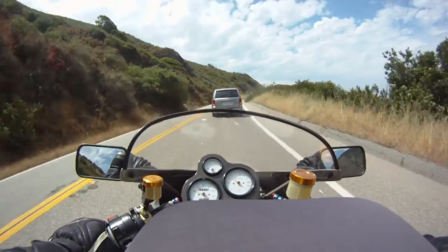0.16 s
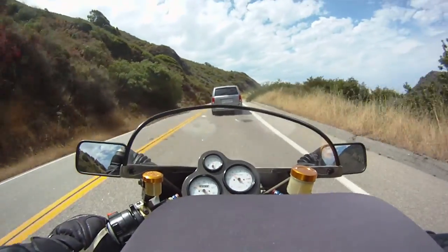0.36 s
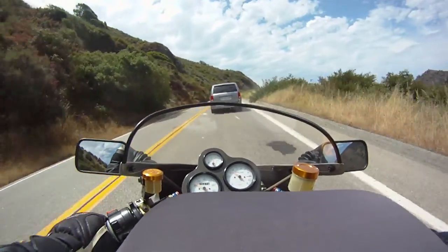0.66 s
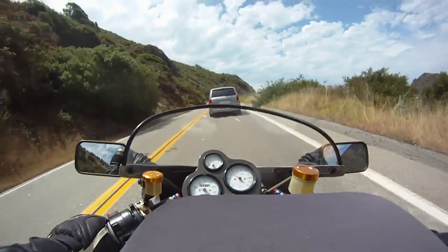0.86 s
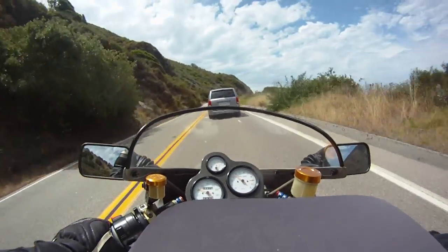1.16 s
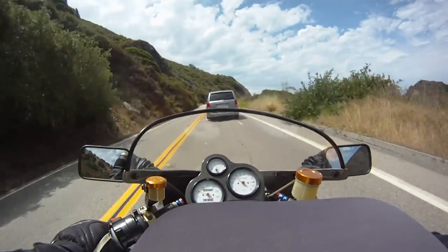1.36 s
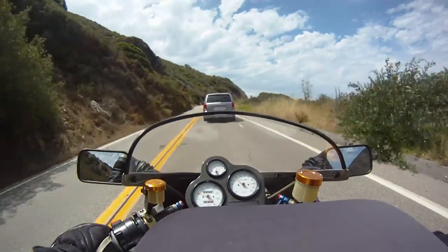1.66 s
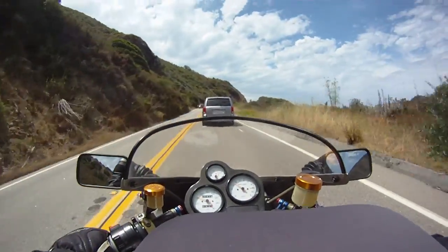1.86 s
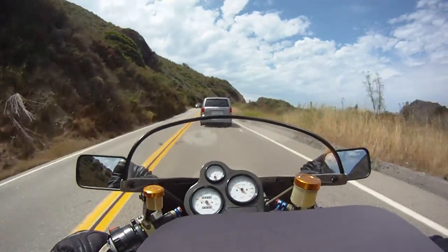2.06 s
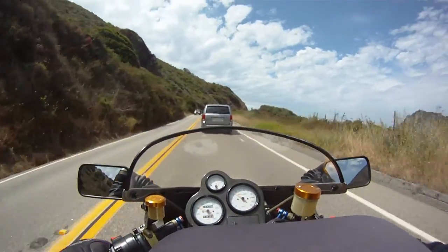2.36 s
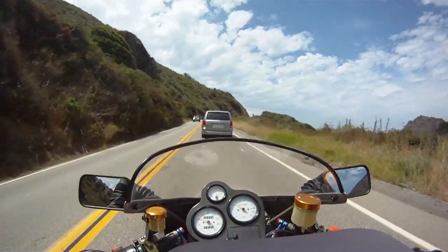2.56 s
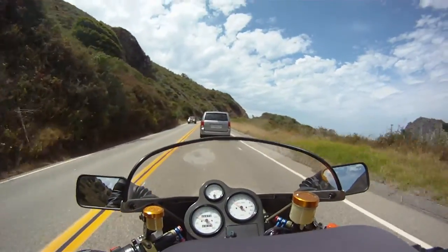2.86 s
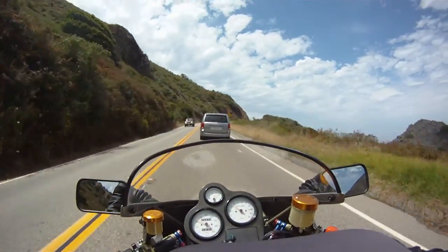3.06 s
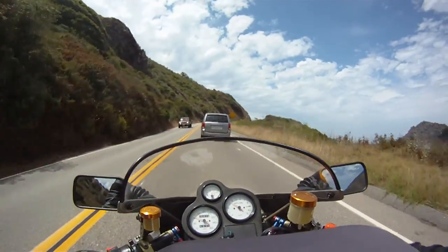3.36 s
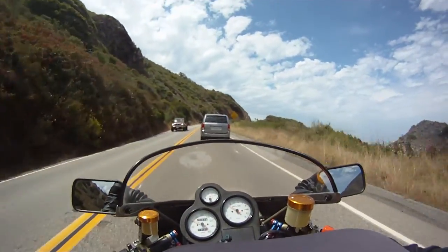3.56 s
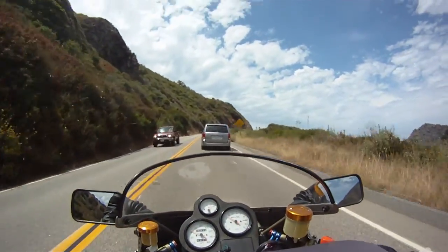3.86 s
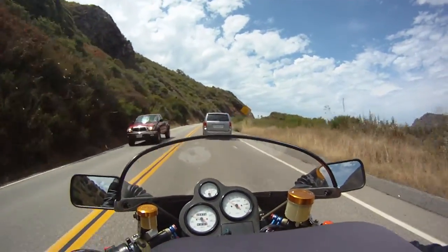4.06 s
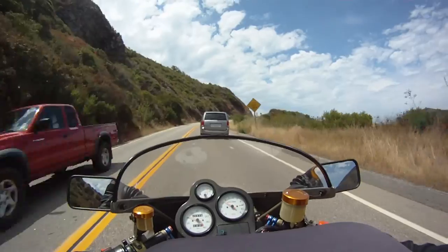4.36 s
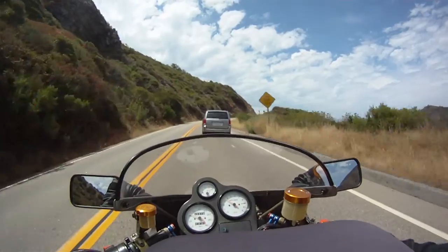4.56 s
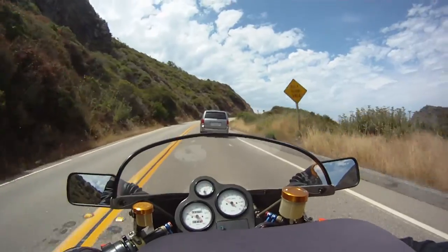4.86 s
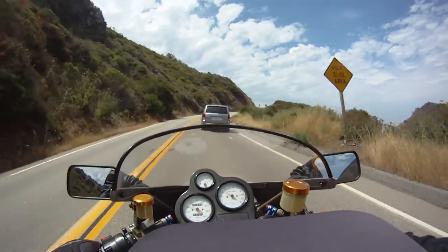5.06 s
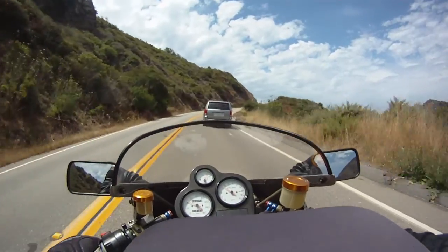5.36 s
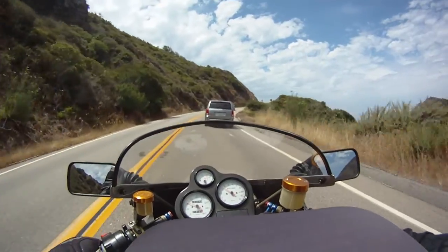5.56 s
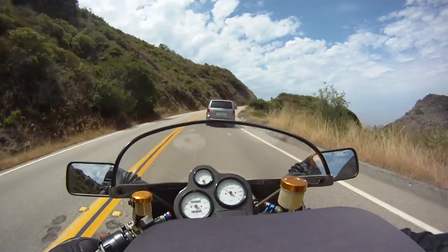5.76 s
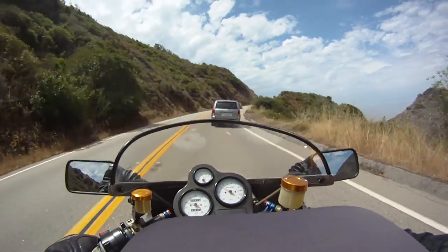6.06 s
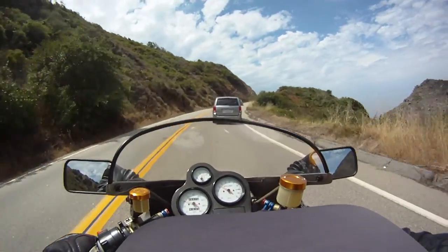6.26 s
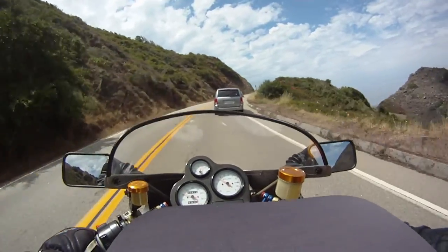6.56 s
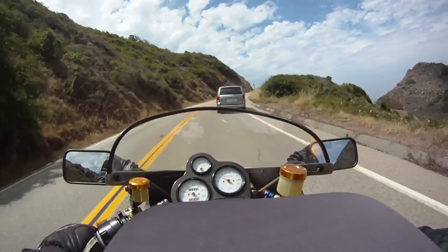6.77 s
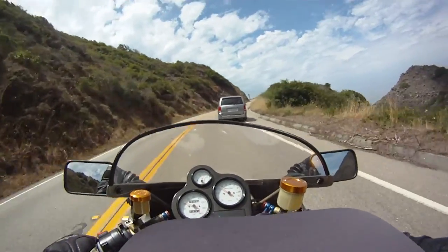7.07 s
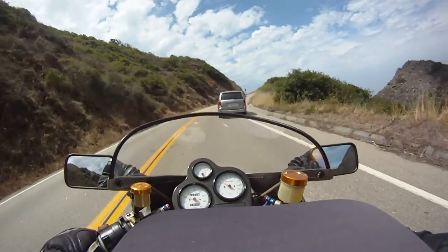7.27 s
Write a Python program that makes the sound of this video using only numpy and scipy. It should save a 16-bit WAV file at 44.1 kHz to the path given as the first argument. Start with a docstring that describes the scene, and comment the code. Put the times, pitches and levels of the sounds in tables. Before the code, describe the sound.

Close onboard microphone behind a motorcycle windscreen on an open coastal road. A twin-cylinder engine drones low and continuous with fine gear whine and valve clatter. Revs edge up in the first second, then slowly sag as the rider eases off. Wind rumbles and flutters throughout, with brief tearing gusts and several hard thumps that momentarily duck everything. Thin, gritty treble sizzle covers it.

```python
"""Coast road: a V-twin motorcycle cruises, revs edging up and then slowly falling, heard behind its windscreen.
The exhaust drones as a sum of cycle orders; valves, gears and engine cases clatter in step with the crank.
Filtered noise makes the wind: it rumbles, tumbles over the screen and tears in gusts.
Heavy buffets are single pressure swings that make the camera's limiter duck.
The camera's coarse sampling mirrors the sound into a thin treble sizzle."""
import sys
import numpy as np
from scipy import signal
from scipy.fft import rfft, irfft, next_fast_len
from scipy.io import wavfile
from scipy.ndimage import minimum_filter1d, map_coordinates

SR = 44100
rng = np.random.default_rng(int(sys.argv[2]) if len(sys.argv) > 2 else 0)


def bounce(signal):
    """Save signal as a 16-bit WAV file at the path given by the first command-line argument."""
    frames = np.transpose(np.atleast_2d(signal))
    limited = np.clip(frames, -1, 1)
    pcm = np.round(limited * 32767).astype(np.int16)
    wavfile.write(sys.argv[1], SR, pcm)


N = 326781
T = np.arange(N) / SR

# spectrum of tearing air: freq_hz, relative_db_per_hz
TEAR_SPECTRUM = [(150, -12), (450, 0), (800, -2), (1500, -9), (2500, -22), (5000, -37)]


def amp(db):
    """Decibels to amplitude ratio."""
    return 10 ** (np.asarray(db) / 20)


def unit(x):
    """x scaled to rms 1."""
    return x / np.sqrt(np.mean(x ** 2) + 1e-20)


def curves(rows):
    """One value per sample for each column after the time."""
    time_s, *columns = np.transpose(rows)
    return [np.interp(T, time_s, column) for column in columns]


def wobble(rate_hz):
    """A smooth random curve through rate_hz random knots a second."""
    knots = rng.standard_normal(int(N * rate_hz / SR) + 4)
    return map_coordinates(knots, [T * rate_hz])


def swell(center_s, peak_db, length_s):
    """A smooth Gaussian rise and fall of amplitude."""
    return amp(peak_db) * np.exp(-((T - center_s) / length_s) ** 2)


def filtered(x, response):
    """x times a complex response of frequency, zero-padded."""
    size = next_fast_len(N + SR // 2)
    freq_hz = np.fft.rfftfreq(size, 1 / SR)
    return irfft(rfft(x, size) * response(freq_hz), size)[:N]


def coloured(x, points):
    """x shaped by (Hz, dB) points on a log-frequency axis."""
    point_hz, point_db = np.transpose(points)
    return filtered(x, lambda hz: amp(np.interp(np.log(hz + 1), np.log(point_hz), point_db)))


def noise(points):
    """Coloured noise of rms 1."""
    return unit(coloured(rng.standard_normal(N), points))


def rung(x, modes):
    """x through parallel resonances of alternating polarity, at rms 1."""
    def response(f):
        total = 0
        for k, (center, width, db) in enumerate(modes):
            damping = 1j * f * width
            total = total + (-1) ** k * amp(db) * damping / (center * center - f * f + damping)
        return total
    return unit(filtered(x, response))


def knocks(cycle, angles, sizes, scatter_db, jitter_s):
    """Impulses at fixed angles of every cycle, scattered in size and time."""
    turns = np.arange(int(cycle[-1]) + 1)[:, None] + np.asarray(angles)
    time_s = np.interp(turns, cycle, T, right=-1) + jitter_s * rng.standard_normal(turns.shape)
    at = time_s * SR
    size = sizes * amp(scatter_db * rng.standard_normal(turns.shape))
    inside = (at > 0) & (at < N - 2)
    whole, part = np.divmod(at[inside], 1)
    whole = whole.astype(int)
    # each impulse is split between two samples
    early = np.bincount(whole, size[inside] * (1 - part), N)
    late = np.bincount(whole + 1, size[inside] * part, N)
    return early + late


def wind():
    """Surging rumble, lumpy eddies that swell and tear in gusts, and the even hiss of air and tyres."""
    # gusts over the screen: center_s, eddy_peak_db, length_s, tear_peak_db
    gusts = [(.035, -20.5, 0.051, -50), (0.577, -18, 0.026, -37.5), (0.95, -23, 0.066, -40),
             (1.035, -23, 0.068, -48), (1.213, -21, .03, -39), (1.406, -22.5, .04, -47),
             (2.01, -25.5, 0.086, -42), (2.535, -27.5, .03, -36), (3.05, -22.5, 0.074, -40),
             (3.21, -21.5, 0.096, -44), (3.369, -18.5, 0.037, -30), (3.44, -22.5, 0.033, -37),
             (3.635, -24, .04, -46), (3.868, -18.5, 0.064, -38.5), (4.11, -24, 0.038, -45),
             (4.299, -22.5, 0.095, -44), (4.847, -25.5, 0.15, -43), (5.197, -25, 0.031, -40),
             (5.336, -21, .035, -38), (5.93, -22, 0.043, -46), (6.051, -21, 0.028, -29.5),
             (6.445, -22, .07, -51), (6.83, -24, 0.098, -46), (7.057, -24, 0.04, -49)]
    # surges of rumbling air: center_s, peak_db, length_s
    surges = [(0.302, -24, 0.088), (1.72, -21.5, .14), (3.03, -24, .08), (3.73, -24, 0.092),
              (4.85, -21.5, .09), (5.83, -21.5, .08), (7.35, -21.5, 0.12)]
    # low air rumble: freq_hz, relative_db_per_hz
    rumble_spectrum = [(10, -27), (25, -0.5), (42, 0.5), (70, -1), (120, -0.5), (190, -7), (260, -12),
                       (400, -32), (800, -57)]
    # eddies off the screen: freq_hz, relative_db_per_hz
    eddy_spectrum = [(80, -34), (180, -1), (280, 0), (420, 1), (520, -2), (620, -8), (750, -15), (950, -26),
                     (1400, -36), (3000, -45)]
    # air and tyre hiss: freq_hz, relative_db_per_hz
    hiss_spectrum = [(200, -21), (800, 7.5), (1300, -2), (2300, 2), (3200, -2.5), (4200, -11),
                     (6000, -18.5)]
    rumble_db, eddy_db, hiss_db = -23, -27.5, -44.5  # median levels of the steady airstream
    tear_share = .55  # of a gust's length: only its crest tears

    rumble_power = amp(rumble_db + 0.85 * wobble(5)) ** 2
    rumble_power += sum(swell(*surge) ** 2 for surge in surges)
    rumble = np.sqrt(rumble_power) * noise(rumble_spectrum)

    eddy_power = amp(eddy_db + 1.1 * wobble(11)) ** 2
    eddy_power += sum(swell(s, db, length_s) ** 2 for s, db, length_s, _ in gusts)
    lumps = amp(2.8 * wobble(170) + 1.05 * wobble(35))
    eddies = np.sqrt(eddy_power) * unit(coloured(rng.standard_normal(N) * lumps, eddy_spectrum))

    crests = sum(swell(s, db, tear_share * length_s) for s, _, length_s, db in gusts)
    tear = crests * unit(noise(TEAR_SPECTRUM) * amp(2.4 * wobble(250)))
    hiss = amp(hiss_db + 1.04 * wobble(10)) * noise(hiss_spectrum)
    return rumble + eddies + tear + hiss


def buffets():
    """Each buffet is a rip of air just ahead of one quick suck and push of pressure on the microphone."""
    # heavy buffets: center_s, peak_db
    blows = [(.963, 2.5), (1.012, -3), (1.07, -1.5), (1.627, -2.5), (1.772, -6), (2.03, 3.5), (2.39, -4.5),
             (4.528, -4.5), (7.06, -8)]
    half_swing_s = .0015  # suction peak to the turn of the pressure
    rip_db, rip_length_s, rip_lead_s = -29, 0.0047, 0.0028  # rip_db re the blow
    out, rip = np.zeros(N), noise(TEAR_SPECTRUM)
    for center_s, peak_db in blows:
        u = (T - center_s) / half_swing_s
        out += amp(peak_db) * u * np.exp((1 - u * u) / 2)
        out += rip * swell(center_s - rip_lead_s, peak_db + rip_db, rip_length_s)
    return out


def gears(cycle, cycles_hz):
    """Each meshing order whines loudest as it passes a resonance of the cases."""
    # gear whine: cycle_order, median_db_at_resonance, resonance_hz, width_hz
    meshes = [(37, -52.5, 1163, 31), (39, -53, 1182, 24), (72, -57, 2255, 30), (73, -53.5, 2270, 45),
              (77, -52.5, 2352, 22), (116, -61.5, 3640, 50)]
    out = np.zeros(N)
    for order, db, resonance_hz, width_hz in meshes:
        order = round(order)
        nearness = 1 / np.hypot(1, 2 * (order * cycles_hz - resonance_hz) / width_hz)
        out += nearness * amp(db + 2.8 * wobble(7)) * np.sin(2 * np.pi * order * cycle)
    return out


def machinery(cycle, count=40):
    """Many small contacts a cycle shake the cases; valves tick above them and a loose panel buzzes at first."""
    # broad colour of the engine cases: freq_hz, gain_db
    case_colour = [(300, -30), (700, 8), (1150, -4), (1350, -0.5), (1700, 1), (2250, 2), (2550, -10.5),
                   (2950, -6.5), (3600, -6.5), (4000, -12), (4600, -12.5), (6000, -22)]
    # engine case resonances: freq_hz, width_hz, gain_db
    case_modes = [(1148, 60, 10), (1540, 78, -16), (1720, 64, -9.5), (2297, 87, 5.5), (2880, 150, -7.5),
                  (3660, 80, -8)]
    # cylinder head resonances: freq_hz, width_hz, gain_db
    head_modes = [(2265, 380, 2.5), (2930, 520, -1.5), (3530, 420, -3.5)]
    # loose panel resonances: freq_hz, width_hz, gain_db
    panel_modes = [(1378, 39, -2), (1500, 160, -5)]
    # valve ticks before the sway: time_s, level_db
    valve_level = [(0, -56), (.5, -55.5), (1.4, -49), (2.2, -51), (3.2, -50.5), (4.8, -52), (5.7, -61.5),
                   (6.6, -50.5), (7.41, -50.5)]
    clatter_db, buzz_db = -45.5, -46
    buzz_end_s, buzz_fade_s = .68, .27

    angles = (np.arange(count) + rng.random(count)) / count
    contacts = knocks(cycle, angles, rng.choice([-1, 1], count), scatter_db=2.5, jitter_s=.00001)
    clatter = unit(coloured(contacts, case_colour)) + amp(-7) * rung(contacts, case_modes)

    valve_angles, valve_sizes = [.26, .35, .39, .46, .96], [0.5, 0.78, 0.95, 0.72, 0.43]
    ticks = knocks(cycle, valve_angles, valve_sizes, scatter_db=3.0, jitter_s=.00004)
    valves = rung(ticks, head_modes)
    valve_db, = curves(valve_level)

    buzz = rung(knocks(cycle, [.92], 1, scatter_db=0.3, jitter_s=.00003), panel_modes)
    settling = np.clip((buzz_end_s - T) / buzz_fade_s, 0, 1)

    sway = amp(1.16 * wobble(8))  # the airstream carries the sound unevenly
    engine = sway * (amp(clatter_db) * clatter + amp(valve_db) * valves)
    return engine + amp(buzz_db) * settling * buzz


def exhaust(cycle):
    """Cycle orders phased by two unevenly spaced firings; closing the throttle trades growl for throb."""
    # steady orders: cycle_order, db_re_drone
    steady_orders = [(1, -20), (2, -9), (5, 0), (6, -14.5), (7, -34), (9, -21.5), (10, -21), (11, -18),
                     (12, -27.5), (14, -25), (15, -21.5), (16, -24), (17, -23.5), (19, -22.5), (21, -31.5)]
    # orders that follow the throttle: cycle_order, shut_db_re_drone, open_db_re_drone
    throttled_orders = [(3, -2, -8), (4, -8, -4), (8, -14.5, -6.5), (13, -11, -10)]
    # the rider eases off: time_s, throttle_0_to_1
    throttle_curve = [(0, 1), (.8, 0.82), (2.2, 0.43), (3.5, 0.6), (4.4, .25), (5.2, 0.26), (6.2, 0),
                      (7.41, 0.15)]
    drone_db = -19.5
    second_firing = 270 / 720  # of a cycle

    throttle, = curves(throttle_curve)
    orders = [*steady_orders]
    for order, shut_db, open_db in throttled_orders:
        orders.append((order, shut_db + throttle * (open_db - shut_db)))
    out = np.zeros(N)
    for order, db in orders:
        order = round(order)
        pair = 1 + 0.66 * np.exp(-2j * np.pi * order * second_firing)
        pipe_lag = .74 * order ** 2  # radians: the pipes smear each pulse in time
        phase = 2 * np.pi * order * cycle + np.angle(pair) - pipe_lag
        out += amp(db + 0.48 * wobble(7)) * np.sqrt(2) * np.cos(phase)
    return out * amp(drone_db + 0.86 * wobble(30))  # uneven firing strength


def limiter(x, ceiling_db, hold_s, release_db_per_s, attack_s):
    """The gain drops quickly on a peak, holds, then climbs back at a steady rate."""
    needed_db = np.minimum(ceiling_db - 20 * np.log10(np.abs(x) + 1e-9), 0)
    half = int(hold_s * SR / 2)
    held_db = minimum_filter1d(needed_db, 2 * half + 1, origin=half)
    climb_db = release_db_per_s * T
    gain_db = np.minimum.accumulate(held_db - climb_db) + climb_db
    pole = np.exp(-1 / (attack_s * SR))
    return x * amp(signal.lfilter([1 - pole], [1, -pole], gain_db))


def scene():
    """One crank angle drives every part of the engine, with the wind around it."""
    # engine speed: time_s, four_stroke_cycles_hz
    speed_curve = [(0, 31.15), (.15, 31.18), (.4, 31.36), (.9, 31.49), (1.65, 31.2), (2.4, 31.02),
                   (3.4, 31.06), (3.9, 30.94), (4.65, 30.59), (5.4, 30.34), (5.9, 30.05), (6.4, 29.57),
                   (6.9, 29.25), (7.41, 28.88)]
    cycles_hz, = curves(speed_curve)
    cycle = np.cumsum(cycles_hz * (1 + 0.00048 * wobble(9))) / SR
    air = wind() + buffets()
    engine = gears(cycle, cycles_hz) + machinery(cycle) + exhaust(cycle)
    return (air + engine)[None]


def record(dry):
    """The camera limits, clips and cuts deep bass; coarse sampling mirrors the sound about its sampling rate."""
    # camera input filter: freq_hz, gain_db
    input_filter = [(5000, 0), (5400, -2.5), (5700, -8), (5950, -13), (6100, -34), (6400, -100)]
    # mirror image by source frequency: freq_hz, gain_db (before the image roll-off)
    mirror_gain = [(30, -43.5), (154, -38), (700, -23), (1500, -16.5), (3000, -9.5), (5500, -1.5)]
    camera_hz, top_hz = 12000, 15350

    held = limiter(dry[0], ceiling_db=-4.3, hold_s=.02, release_db_per_s=52, attack_s=.0006)
    held = held / (1 + np.abs(held / .8) ** 12) ** (1 / 12)  # clips what overshoots the limiter
    held = signal.sosfilt(signal.butter(2, 18, "highpass", fs=SR, output="sos"), held)
    sound = coloured(held, input_filter)
    images = coloured(sound, mirror_gain) * 2 * np.cos(2 * np.pi * camera_hz * T)
    images = coloured(images, [(12000, 0), (15000, -3.5)])  # image roll-off
    return filtered(sound + images, lambda hz: hz < top_hz)[None]


dry = scene()
out = record(dry)
bounce(out)
```